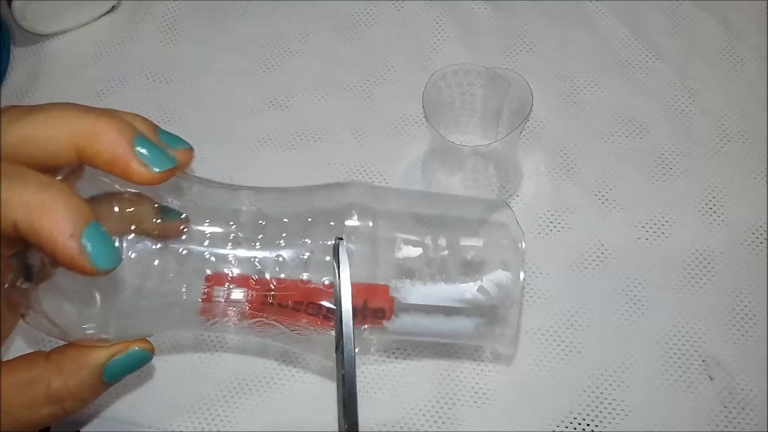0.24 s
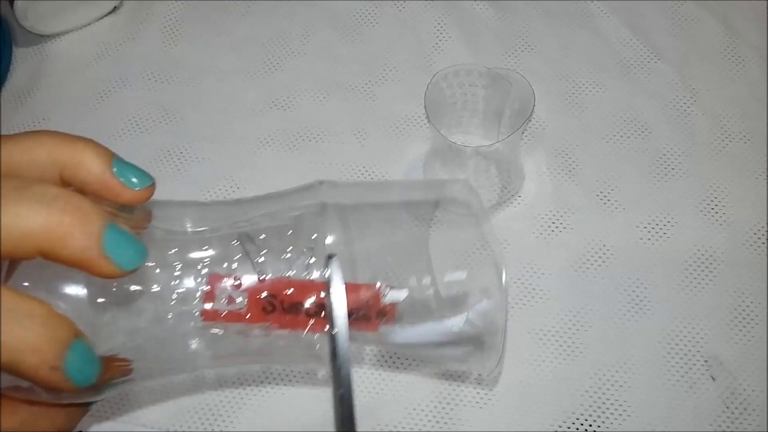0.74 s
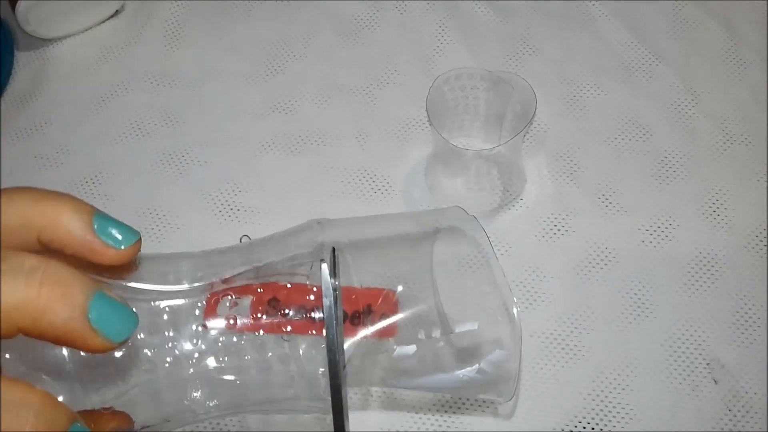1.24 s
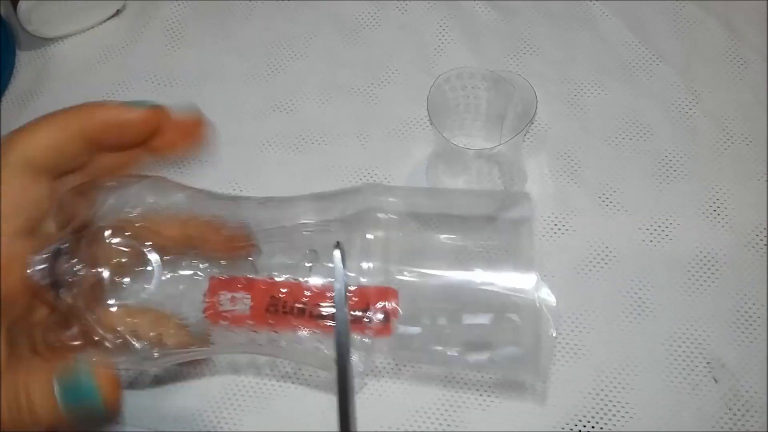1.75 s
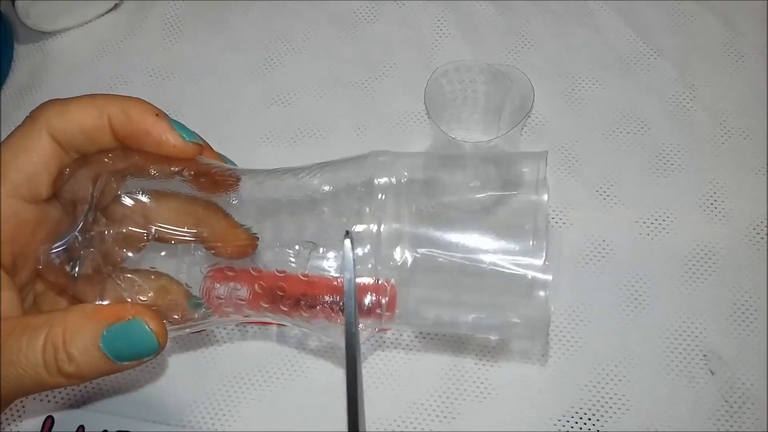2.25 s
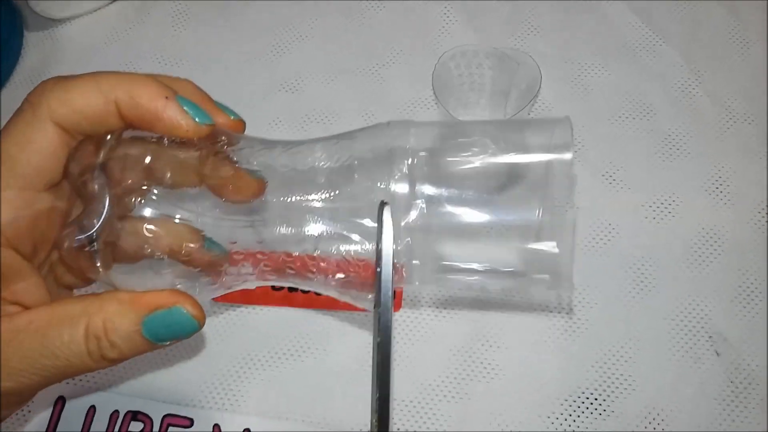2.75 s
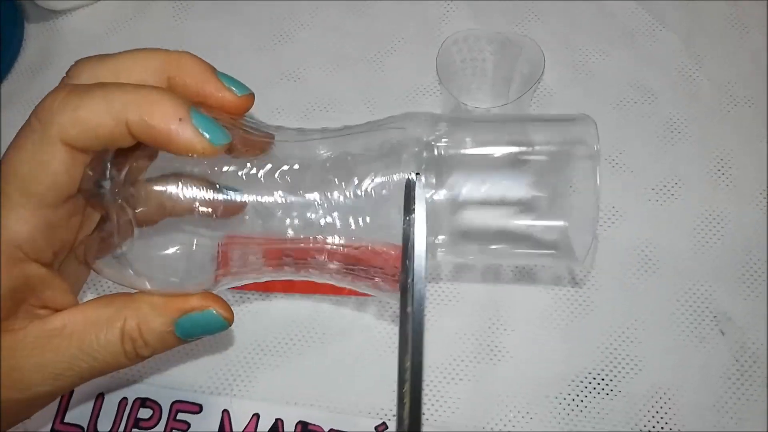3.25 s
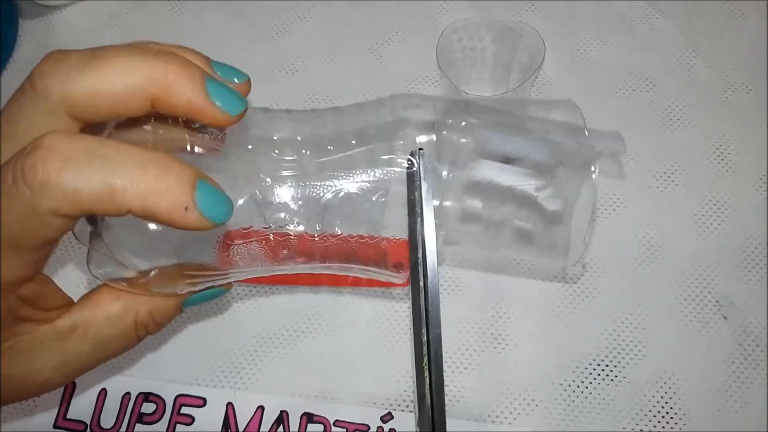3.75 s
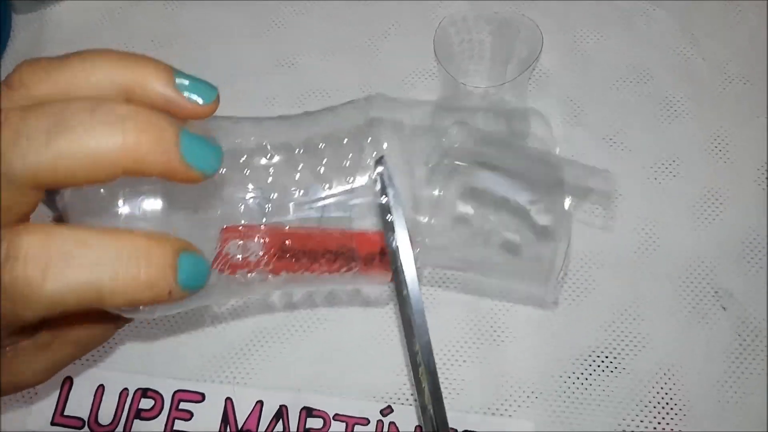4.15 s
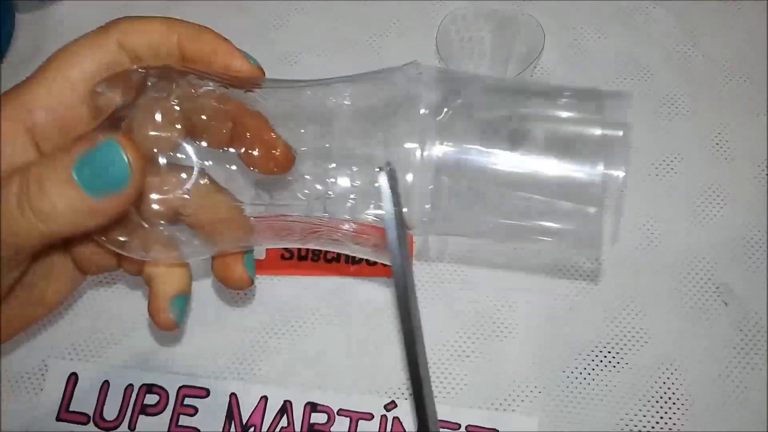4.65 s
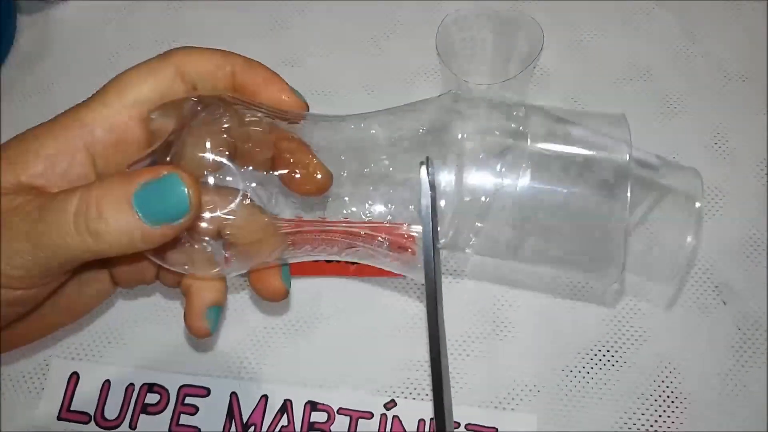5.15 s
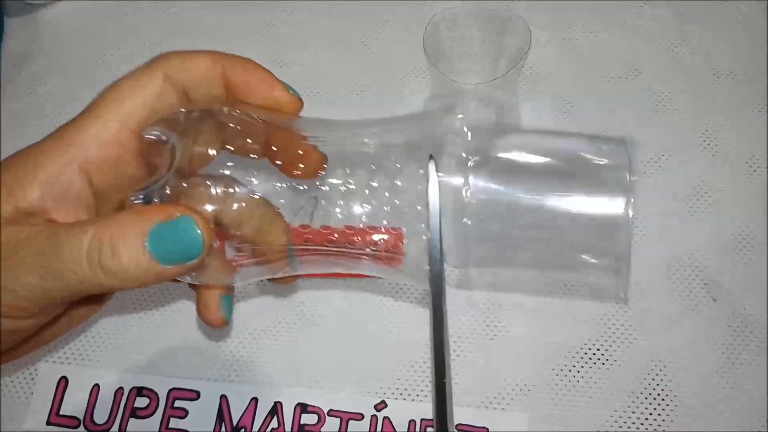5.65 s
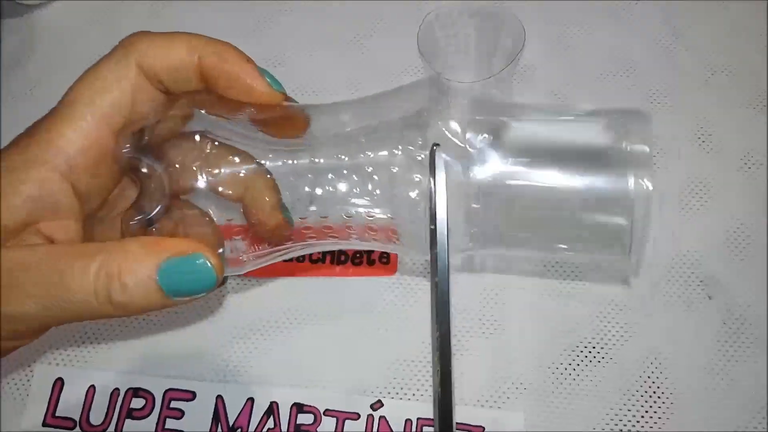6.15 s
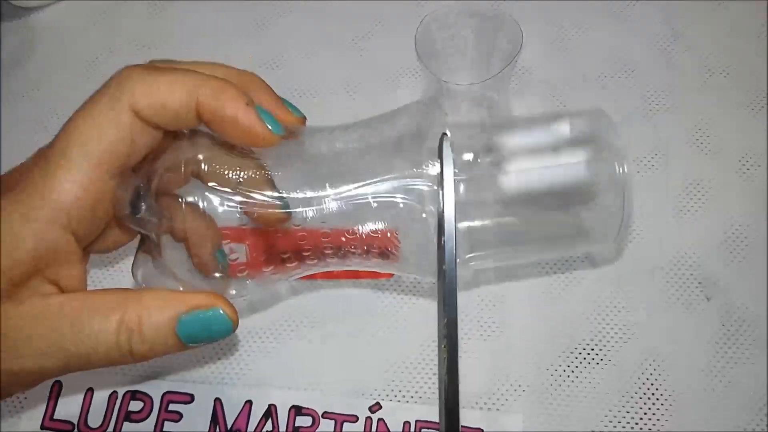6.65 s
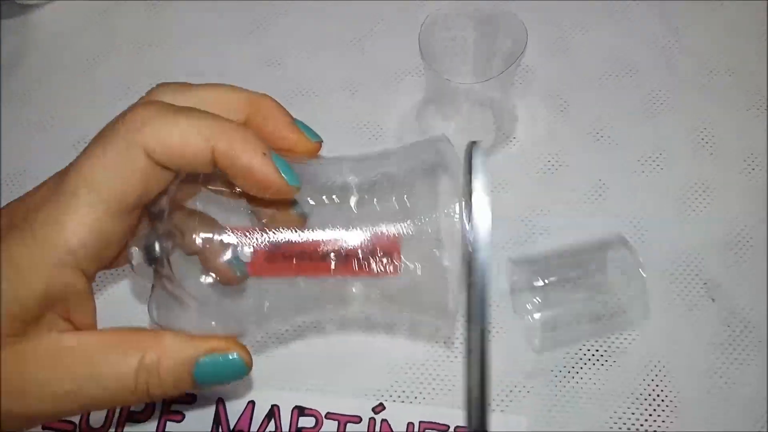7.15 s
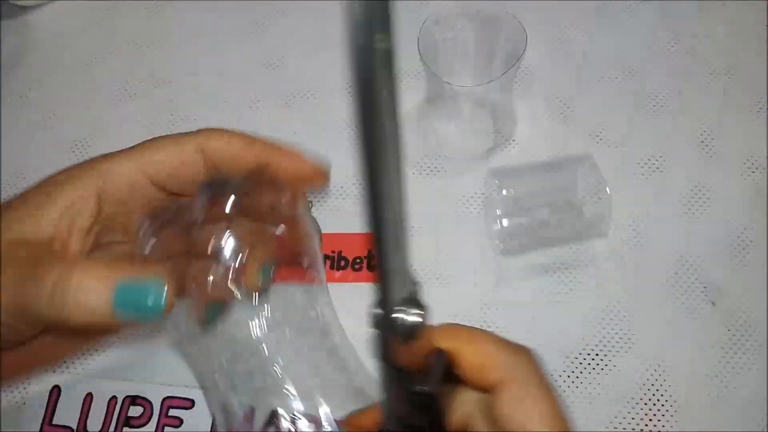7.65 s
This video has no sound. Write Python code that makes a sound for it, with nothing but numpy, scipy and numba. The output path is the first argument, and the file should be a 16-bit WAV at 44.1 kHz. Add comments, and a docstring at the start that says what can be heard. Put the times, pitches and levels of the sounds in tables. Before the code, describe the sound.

In a small room with little echo, a plastic bottle crackles and snaps under scissors, heard from very near. The cutting starts fairly lightly, then comes in louder, denser clusters of cracks, linked by blade scrapes and plastic rustle with a slightly hollow ring. A few bright steel clicks join the last loud cracks before the sound thins to soft ticks. Quiet hum and room noise continue throughout.

```python
"""A scrape of scissor blades, then sharp cracks: a stiff plastic bottle is being cut, close to a phone
microphone, on a cloth-covered table in a small soft room. The wall cracks and pops as it gives; between
cracks the blades scrape and the plastic rustles. Both ring the thin wall and the air tube inside, whose
note rises as the cut opens. Near the end the bare blades click. A wavering hum, a low rumble and room
noise lie underneath."""
import sys
import numpy as np
from scipy import signal
from scipy.fft import rfft, irfft
from scipy.io import wavfile
from scipy.ndimage import uniform_filter1d
from numba import njit

SR = 44100
rng = np.random.default_rng(int(sys.argv[2]) if len(sys.argv) > 2 else 0)


def waveform_to_disk(signal):
    """Save audio, clipped to [-1, 1], as 16-bit WAV at the path in sys.argv[1]."""
    frames = np.transpose(np.atleast_2d(signal))
    scaled = np.clip(frames, -1, 1) * 32767
    samples = np.round(scaled).astype(np.int16)
    wavfile.write(sys.argv[1], SR, samples)


N = 348345


def undb(db):
    return 10 ** (np.asarray(db) / 20)


def unit_rms(x):
    return x / np.sqrt(np.mean(x ** 2))


def curves(table):
    """One value per sample for each column after the time."""
    times, *columns = np.transpose(table)
    return [np.interp(np.arange(N) / SR, times, column) for column in columns]


@njit
def moving_band(x, hz, width_hz):
    """State-variable band-pass with a moving centre, gain 1 there."""
    y, band_state, low_state = np.empty(len(x)), 0., 0.
    for i in range(len(x)):
        g, damping = np.tan(np.pi * hz[i] / SR), width_hz / hz[i]
        v = (band_state + g * (x[i] + 1e-18 - low_state)) / (1 + g * (g + damping))
        band_state = 2 * v - band_state
        low_state += 2 * g * v
        y[i] = damping * v
    return y


def band(x, hz, width_hz):
    return moving_band(x, hz + np.zeros(len(x)), float(width_hz))


def wander(rate_hz):
    """Random levels held 1 / rate_hz s and smoothed twice."""
    hold = int(SR / rate_hz)
    steps = np.repeat(rng.standard_normal(N // hold + 1), hold)
    return uniform_filter1d(uniform_filter1d(steps, hold), hold)[:N]


# Noise floor at the microphone: f/Hz, relative level/dB
ROOM_SPECTRUM = [(20, -27.5), (60, -7), (150, -1), (300, -8.5), (1000, -15.5), (3000, -17.5), (7000, -22.5),
                 (15500, -18.5)]
def room_tone(level_db=-62):
    """Smooth, steady noise of the room and the microphone."""
    hz = np.maximum(np.fft.rfftfreq(N, 1 / SR), 1)
    points_hz, points_db = np.transpose(ROOM_SPECTRUM)
    shape = undb(np.interp(np.log(hz), np.log(points_hz), points_db))
    return unit_rms(irfft(rfft(rng.standard_normal(N)) * shape, N)) * undb(level_db)


# Rumble in the room: t/s, level/dB
RUMBLE_LEVEL = [(0.0, -63), (0.26, -71), (0.81, -61), (1.41, -95), (1.74, -70.5), (4.75, -62), (5.01, -79),
                (5.67, -66), (7.9, -72)]
def rumble():
    """Low noise that swells and sinks unevenly."""
    level_db, = curves(RUMBLE_LEVEL)
    low_noise = band(band(rng.standard_normal(N), 100, 81), 100, 140)
    return unit_rms(low_noise) * undb(level_db + 6.8 * wander(7.9))


# Hum in the background: t/s, level/dB
HUM_LEVEL = [(0.0, -52), (0.31, -59), (1.74, -66), (1.91, -60), (4.77, -55), (5.17, -66.5), (5.9, -56),
             (6.49, -63), (7.0, -56.5), (7.61, -82.5), (7.9, -79)]
def hum(hz=184.7, width_hz=33):
    """A tone wavering in pitch and level, inside a narrow band of noise."""
    level_db, = curves(HUM_LEVEL)
    phase = 2 * np.pi * np.cumsum(hz + 2.5 * wander(15)) / SR
    tone = np.sin(phase) * undb(3.4 * wander(5.3))
    noise = unit_rms(band(rng.standard_normal(N), hz, width_hz))
    return (tone + 0.34 * noise) * undb(level_db)


def room_echo(x, t60_s=0.29, wet_db=-18.5):
    """Close up in a small soft room: the direct sound and a faint, slightly dull tail."""
    t = np.arange(int(.4 * SR)) / SR
    tail = band(rng.standard_normal(len(t)), 1700, 4200) * np.exp(-np.log(1000) * t / t60_s) * (t > .004)
    return x + undb(wet_db) * signal.fftconvolve(x, tail / np.sqrt(np.sum(tail ** 2)))[:N]


# Note of the air tube inside the bottle: t/s, f/Hz
TUBE_NOTE = [(0, 698), (1.7, 701.6), (3.2, 725), (4.1, 776.5), (4.7, 766.7), (5.6, 770.4), (6.0, 805.4),
             (6.7, 808), (6.92, 775), (7.08, 840), (7.9, 824)]
def tube_sustain(x):
    """The air column keeps singing for a moment after each push."""
    tube_hz, = curves(TUBE_NOTE)
    return 0.41 * band(x, tube_hz, width_hz=5.5)


# Modes of the bottle's wall: f/Hz, width/Hz, level/dB
WALL_MODES = [(1145, 630, -3), (1842, 220, 0.5), (2270, 287, 3), (2890, 273, 5.5), (3320, 530, 2.5),
              (3896, 520, 6), (4454, 725, 3), (5220, 595, 6.5), (5886, 1220, -1), (8830, 410, -21)]
def wall(x, flicker_db=0):
    """The thin wall rings; under a moving blade each mode comes and goes."""
    out = np.zeros(len(x))
    for k, (hz, width_hz, db) in enumerate(WALL_MODES):
        drive = x * undb(flicker_db * wander(70)) if flicker_db else x
        out += (-1) ** k * undb(db) * band(drive, hz, width_hz)
    return out


def fizz(x):
    """Broad treble above the wall's modes."""
    return band(band(x, 7700, 10000), 10730, 8100)


# Bare blades meeting near the microphone: t/s, peak level/dB
BLADE_CLICKS = [(6.622, -31), (6.938, -26), (7.082, -20), (7.121, -21), (7.136, -26), (7.18, -31),
                (7.24, -9.5)]
def blade_clicks():
    """Short bright clicks of steel on steel."""
    out = np.zeros(N)
    ms = np.arange(400) * 1000 / SR
    for s, db in BLADE_CLICKS:
        start = int(s * SR)
        click = band(rng.standard_normal(len(ms)) * np.exp(-(ms / 1.2) ** 2), 8800, 3900)
        out[start:start + len(ms)] += undb(db) * click / np.abs(click).max()
    return out


# Shearing swells of the blades: top t/s, fall/ms, level/dB, relative tube level/dB
BLADE_STROKES = [(0.0, 20, -34, -4), (0.07, 51, -55, 1), (0.426, 40, -53, -13), (0.602, 40, -49, -12),
                 (0.699, 40, -65, 0), (0.873, 22, -61.5, -11), (0.971, 34.7, -40, 1.5),
                 (1.37, 19, -60.5, -16), (1.52, 28, -63, -2), (1.741, 15.6, -53.5, -7.5),
                 (1.787, 11.7, -27, -7.5), (1.84, 33, -46, -3.5), (1.981, 33, -59, 0.5),
                 (2.3, 25, -50.5, -5), (2.347, 13, -40.5, -12), (2.554, 26, -43.5, -9),
                 (2.724, 17, -56, -2.5), (2.981, 39, -32.5, -15), (3.253, 17, -40, 1),
                 (3.385, 47, -38, -10), (3.562, 46.6, -36.5, -7.5), (3.738, 42, -43, -11),
                 (4.095, 47.4, -39, -5.5), (4.217, 22, -48, 2.5), (4.395, 29, -33.5, -7.5),
                 (4.529, 45, -38.5, -9), (4.657, 86, -47.5, -3.5), (4.79, 38, -39, -6.5),
                 (4.952, 18, -45, -5), (5.3, 28, -35.5, -7), (5.41, 42, -54.5, -4), (5.69, 28, -43.5, -7),
                 (5.795, 43, -44, -1), (5.949, 40, -49.5, -1.5), (6.032, 17, -57, -5),
                 (6.118, 27, -34.5, -14), (6.18, 14, -37, -1.5), (6.298, 50, -40, -7),
                 (6.521, 31.5, -33.5, -10), (6.613, 16, -39.5, -6), (6.677, 36, -39.5, -5),
                 (6.74, 11, -47, -9), (6.86, 78, -46, -6), (6.915, 34, -35.5, -8), (6.98, 16, -48, -17),
                 (7.14, 25, -43.5, -26), (7.2, 35, -44, -6), (7.27, 19, -42.5, -1.5), (7.428, 23, -50, -28),
                 (7.69, 17, -39.5, -24)]
def strokes(blade_hz, rise_per_fall=0.93):
    """Each push of the blades is a swell that rises nearly as slowly as it falls."""
    return [(s, rise_per_fall * fall_ms, fall_ms, db, blade_hz[int(s * SR)], tube_db)
            for s, fall_ms, db, tube_db in BLADE_STROKES]


def pressure(swells):
    """Swells add in power, giving the push on the wall, the push on the air and the brightest pitch."""
    wall_power, tube_power = np.full((2, N), 1e-12)
    weighted_hz = np.zeros(N)
    for s, rise_ms, fall_ms, db, hz, tube_db in swells:
        top = int(SR * s)
        span = np.arange(max(0, top - 8000), min(N, top + 8000))
        ms = (span / SR - s) * 1000
        power = undb(2 * db) * np.exp(-2 * np.abs(ms / np.where(ms < 0, rise_ms, fall_ms)) ** 1.78)
        wall_power[span] += power
        tube_power[span] += power * undb(2 * tube_db)
        weighted_hz[span] += power * hz
    return np.sqrt(wall_power), np.sqrt(tube_power), np.clip(weighted_hz / wall_power, 2000, 8000)


# Close-up colour as the cut travels: t/s, brightest f/Hz, treble and table level/dB against the wall
CUT_COLOUR = [(0, 3800, -22, -6.5), (0.9, 3700, -18, -6), (1.5, 3300, -33, -2.5), (1.8, 3900, -22, -6),
              (2.4, 3900, -13, -10), (3.0, 3900, -12.5, -10), (3.4, 5100, -13, -9.5),
              (3.8, 3600, -18.5, -8), (4.1, 4900, -18.5, -8.5), (4.35, 4900, -23, -7.5),
              (4.8, 5000, -18, -10.5), (5.3, 5200, -18, -12), (5.9, 5200, -17.5, -14),
              (6.5, 5400, -17.5, -16.5), (6.9, 5400, -20.5, -23), (7.05, 5000, -30.5, -17.5),
              (7.12, 4900, -4, -8.5), (7.3, 4040, -7.5, -18.5), (7.9, 5000, -16, -12)]
def scrape_and_rustle(tube_hz, slips_per_s=6000, ticks_per_s=110):
    """Dense stick-slip grains in strokes and after cracks; one push shakes wall, tube and table."""
    blade_hz, treble_db, table_db = curves(CUT_COLOUR)
    push, air_push, patch_hz = pressure(strokes(blade_hz) + rustles())
    slipping = rng.random(N) < slips_per_s / SR
    slips = slipping * undb(1.2 * rng.exponential(size=N)) * rng.standard_normal(N)
    grains = unit_rms(slips) * undb(4 * wander(260))
    # now and then a fibre of plastic lets go with a dry tick
    grains += 10 * (rng.random(N) < ticks_per_s / SR) * rng.standard_normal(N)
    hiss = rng.standard_normal(N) * undb(3 * wander(60))
    ring = wall(grains, flicker_db=3)
    # the patch under the blade sounds loudest
    body = undb(5) * ring + band(ring, patch_hz, 1700) + undb(-4) * band(grains, patch_hz, 660)
    treble = undb(treble_db) * unit_rms(fizz(grains))
    table = undb(table_db) * unit_rms(band(band(hiss, 280, 760), 400, 700))
    tube = unit_rms(band(hiss + 0.81 * grains, tube_hz, 38))
    return push * (unit_rms(body) + treble + table) + air_push * tube


# The wall giving way, close to the microphone:
# t/s, wall peak level/dB, loudest f/Hz, tube and rustle level/dB against that peak
WALL_CRACKS = [(0.1256, -31, 2880, -24, -14), (0.154, -40.5, 4300, -30, -11),
               (0.18, -34.5, 4300, -34, -6.5), (0.2211, -18.5, 4200, -25, -13.5),
               (0.2793, -32.5, 3600, -15, -17.5), (0.3795, -42, 3350, -6, -16),
               (0.634, -39.5, 4050, -5, -16.5), (0.655, -48.5, 3600, 6, -13),
               (0.678, -44.5, 3970, -2, -17.5), (0.729, -50.5, 4000, 3, -19), (0.7687, -49, 4000, 8, -9),
               (0.788, -49, 4000, 8, -9), (0.845, -42, 4000, -15, -18.5), (0.9487, -27.5, 3430, -12, -15),
               (0.9847, -23, 3670, -22, -34), (1.342, -43, 3800, -24, -21), (1.357, -43, 3800, -21, -13.5),
               (1.379, -49, 3000, -8, -19.5), (1.44, -51, 3520, -25, -17), (1.468, -46, 2900, -34, -13.5),
               (1.7614, -8.5, 3960, -13, -14.5), (1.7655, -10.5, 4290, -14, -17.5),
               (1.8094, -28.5, 4950, -5, -15), (2.068, -42, 3100, -12, -8.5),
               (2.3062, -30.5, 4410, -14.5, -28.5), (2.3714, -26, 4060, -10, -19.5),
               (2.385, -25.5, 3800, -5, -12.5), (2.4219, -35, 5660, -1, -15),
               (2.632, -42.5, 4100, -20.5, -10), (2.734, -45.5, 3800, -24, -15),
               (2.8105, -20, 3330, -7, -9.5), (2.8254, -20, 5270, -9.5, -16.5),
               (2.8718, -15, 4020, -10.5, -19), (3.137, -40, 5030, -19.5, -21),
               (3.1742, -27, 3460, -40.5, -4.5), (3.2071, -23, 4720, -1.5, -6.5),
               (3.3067, -6.5, 4930, -32.5, -29), (3.5227, -24, 2450, -30, -22.5),
               (3.5393, -15.5, 4900, -24, -19.5), (3.5668, -19, 4970, -7, -11),
               (3.5879, -20, 5600, -7, -10), (3.8796, -44, 3820, -30, -4.5),
               (3.901, -26.5, 3660, -15, -19.5), (3.9145, -21.5, 4330, -15, -11.5),
               (3.9514, -30, 4250, -29, -9.5), (3.9689, -20.5, 4170, -9, -25.5),
               (3.9908, -29, 5340, -15.5, -19.5), (4.2718, -31.5, 3250, -33.5, -2.5),
               (4.3028, -16.5, 3300, -23, -18), (4.3204, -24, 4400, -13.5, -24.5),
               (4.341, -25.5, 4670, -16, -4.5), (4.4617, -25, 5040, -38, -15.5),
               (4.4937, -26.5, 4660, -20, -13.5), (4.556, -19, 4040, -15.5, -15),
               (4.5895, -23.5, 4070, -17.5, -25.5), (4.7303, -24.5, 5040, -17.5, -17),
               (4.7606, -23, 2240, -2, -15.5), (4.934, -38, 3800, -2, -17), (5.039, -51.5, 2670, -10, -13),
               (5.3093, -19.5, 3560, -28, -13.5), (5.3576, -29, 2100, -9.5, -10),
               (5.5695, -3, 3720, -26.5, -21), (5.5902, -11, 2270, -17, -20),
               (5.6146, -7.5, 4830, -21, -19.5), (5.6507, -17, 4840, -21, -16),
               (5.7216, -27.5, 2270, -22, -14), (5.7339, -24, 4840, -10.5, -27.5),
               (5.7484, -34.5, 2350, -25, -19), (5.8422, -39, 5130, -22, -18),
               (5.8576, -32.5, 4100, -11, -15), (5.9389, -34, 2650, -25, -23.5),
               (6.1205, -28.5, 2330, -3.5, -14.5), (6.1378, -19, 4830, -14, -28.5),
               (6.42, -45.5, 3760, -11, -16.5), (6.4849, -5, 5770, -26, -23),
               (6.5189, -17, 6100, -16.5, -37), (6.5372, -9, 4870, -16.5, -19),
               (6.642, -25.5, 5300, -12.5, -13), (6.913, -13, 2840, -1, -27),
               (6.9541, -21.5, 5900, -11.5, -17), (7.0542, -15.5, 4760, -9, -13),
               (7.0807, -11.5, 4940, -21, -17), (7.1174, -26.5, 4740, -7, -20),
               (7.2337, -15, 5130, -35, -33), (7.2383, -5.5, 4800, -18, -26), (7.61, -41, 4500, -36, -18.5),
               (7.745, -44.5, 3530, -32, -14), (7.84, -39, 5000, -27, -11.5)]
def cracks(tube_hz, thump_db=-37, fizz_db=-16, tube_rise_ms=2.3, tube_decay_ms=3.96):
    """Each crack tears for a few ms; it rings the wall, its own loudest patch, the tube and the table."""
    size = int(.06 * SR)
    out = np.zeros(N + size)
    ms = np.arange(size) * 1000 / SR
    _, treble_db, _ = curves(CUT_COLOUR)
    tube_envelope = (1 - np.exp(-ms / tube_rise_ms)) * np.exp(-ms / tube_decay_ms)
    for s, db, patch_hz, tube_db, _ in WALL_CRACKS:
        start = int(s * SR)
        # a sharp start, then a short ragged tear
        burst = 3.1 * (ms == 0) + rng.standard_normal(size) * np.exp(-(ms / 3.6) ** 2)
        ring = wall(burst) + undb(13) * band(burst, patch_hz, 270)
        tube = tube_envelope * np.sin(2 * np.pi * tube_hz[start] * ms / 1000)
        thump = band(band(burst, 300, 500), 330, 700)
        bright_db = fizz_db + 0.55 * treble_db[start]  # cracks fizz where the scrape is bright
        for part, part_db in (ring, 0), (tube, tube_db), (thump, thump_db), (fizz(burst), bright_db):
            out[start:start + size] += undb(db + part_db) * part / np.abs(part).max()
    return out[:N]


def rustles(rise_ms=3.5, fall_ms=18.3, tube_carry=0.43):
    """The wall shivers on in a brief swell after each crack; a hollow crack leaves a hollow rustle."""
    return [(s + rise_ms / 1000, rise_ms, fall_ms, db + rustle_db, hz, 0.1 + tube_carry * tube_db)
            for s, db, hz, tube_db, rustle_db in WALL_CRACKS]


def scene():
    """Bottle and scissors up close, the room behind them, in mono."""
    tube_hz, = curves(TUBE_NOTE)
    bottle = cracks(tube_hz) + scrape_and_rustle(tube_hz)
    close_up = bottle + tube_sustain(bottle) + blade_clicks()
    return (room_echo(close_up) + room_tone() + rumble() + hum())[None]


def record(dry):
    """The phone's microphone thins the bass below 60 Hz and cuts the top above 15.9 kHz."""
    thinned = signal.sosfilt(signal.butter(1, 60, "high", fs=SR, output="sos"), dry)
    return signal.sosfilt(signal.ellip(10, .2, 60, 15900, fs=SR, output="sos"), thinned)


dry = scene()
out = record(dry)
waveform_to_disk(out)
```